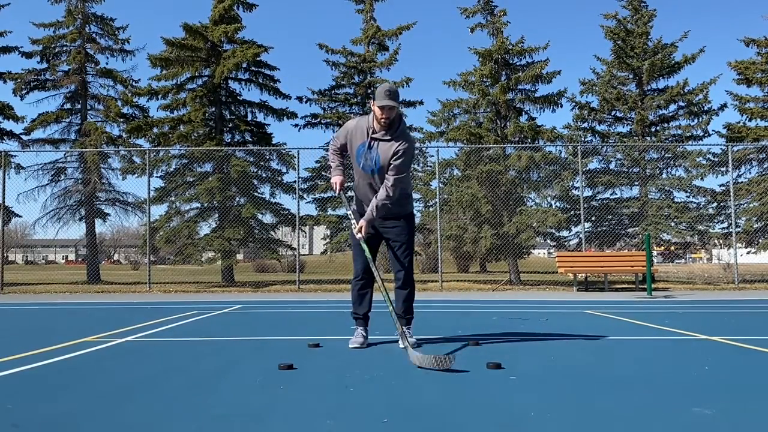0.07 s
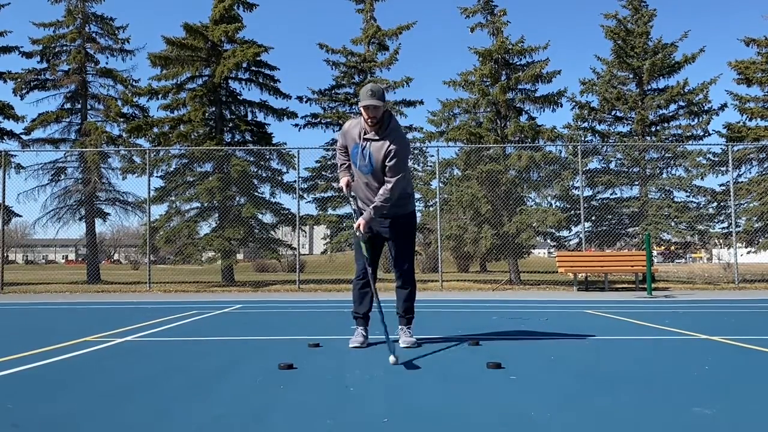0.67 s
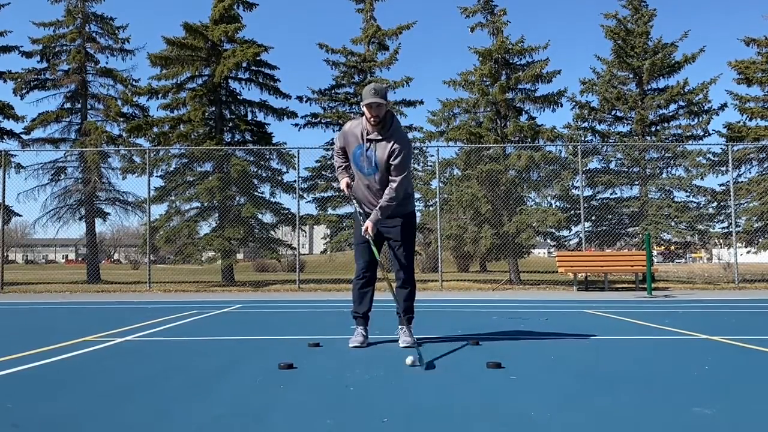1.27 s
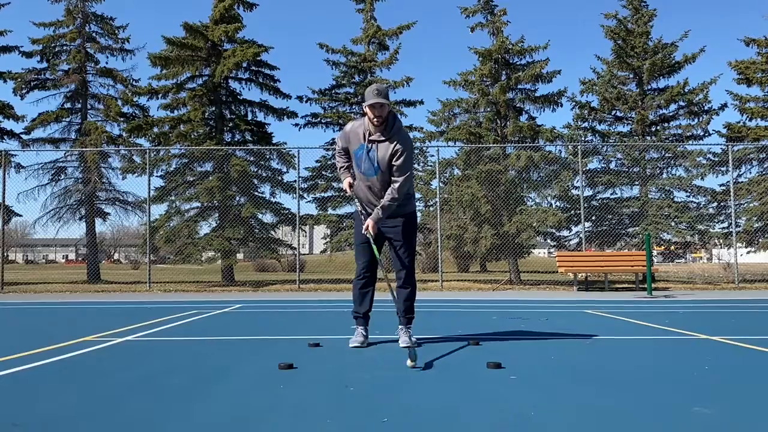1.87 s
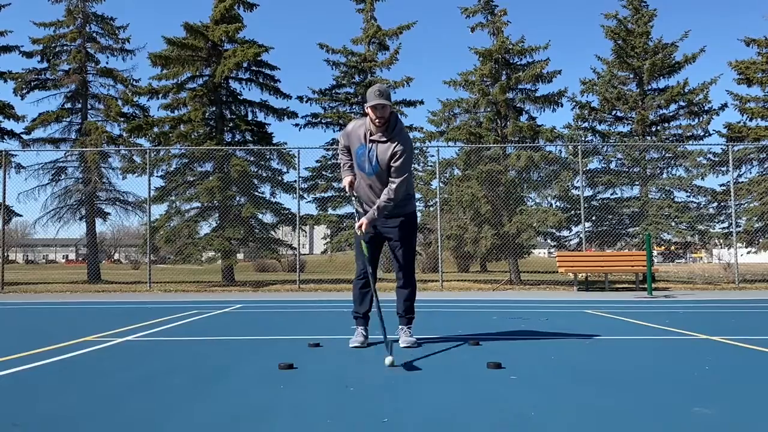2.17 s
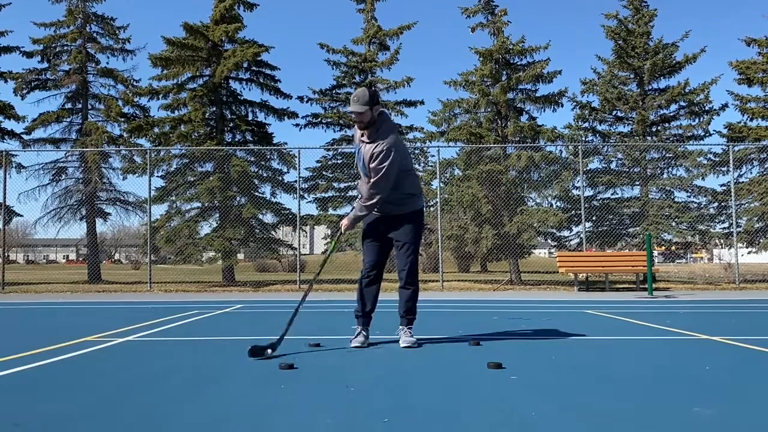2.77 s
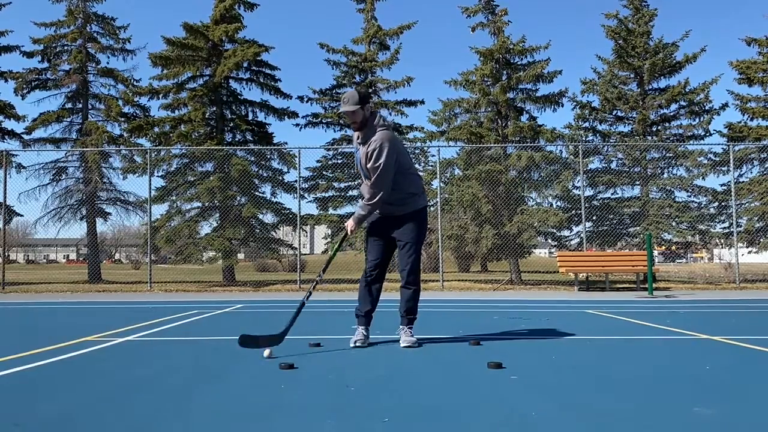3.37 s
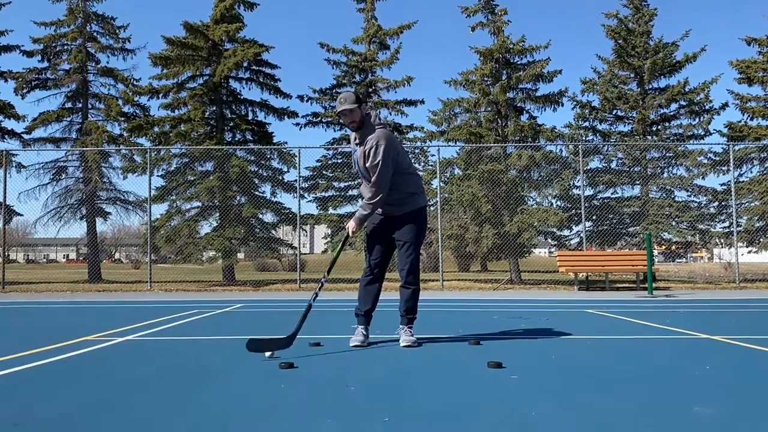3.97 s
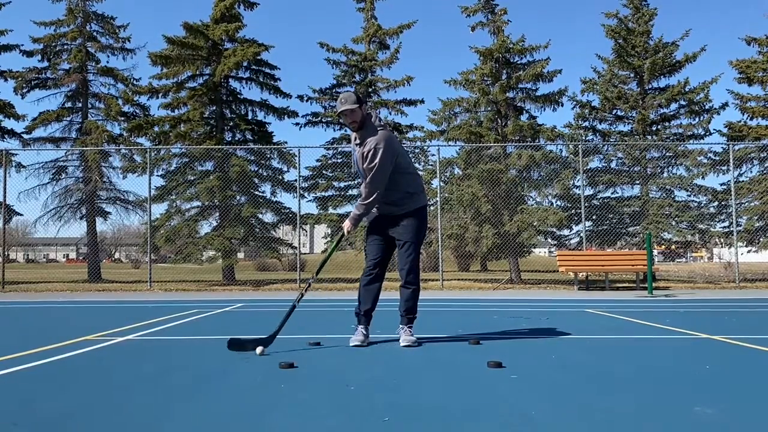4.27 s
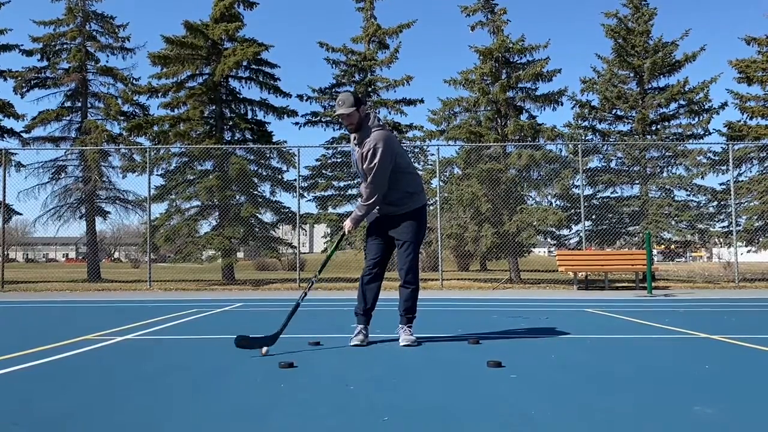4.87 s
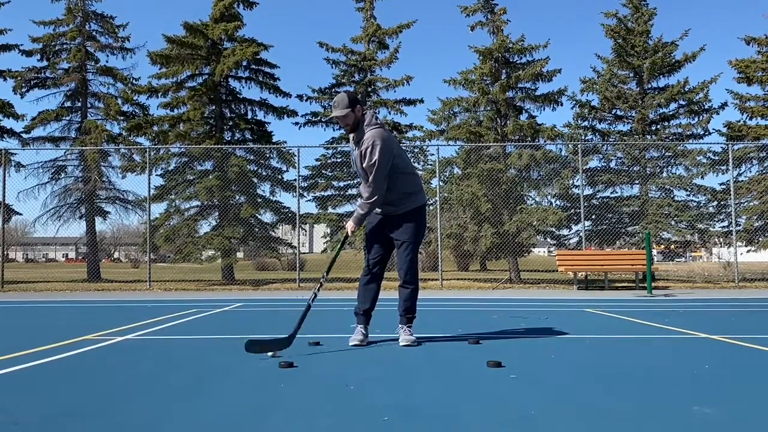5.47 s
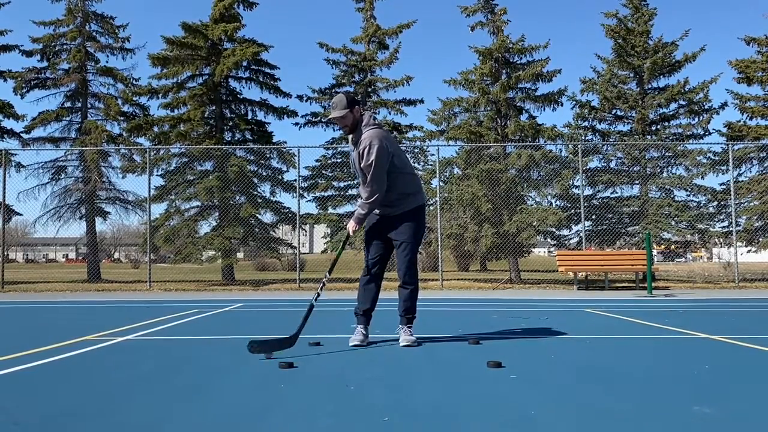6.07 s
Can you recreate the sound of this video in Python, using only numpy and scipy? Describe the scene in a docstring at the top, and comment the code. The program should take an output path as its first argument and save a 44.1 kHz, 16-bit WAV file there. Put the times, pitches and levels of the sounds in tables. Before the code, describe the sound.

A hockey stick dribbles a hard ball on an outdoor asphalt court for about six seconds. It opens with a loud, hollow crack and a short scrape, then sharp taps follow about four times a second, uneven in strength and often doubled as the blade chatters on the ground. Faint ringing lingers near 0.7, 2.1 and 2.4 seconds. Brief gritty scrapes come around 1.9, 2.4, 3.5 and 5.4 seconds. After a small gap, the tapping resumes at 2.8 seconds, slightly brighter and further left, settling into a steadier run of firm clacks until a last, softer one at about 6 seconds. Each hit sends a faint, quick echo back from the fence and trees. Beneath it all lie a quiet distant hush and light wind buffeting the microphone, with one stronger gust from about 5 to 5.5 seconds.

```python
"""Hockey dribble on an outdoor court.

A player dribbles a hard ball, first at his feet, then out to one side. The stick's hollow blade
cracks on the ball, chatters and scrapes on the asphalt; a faint ringing lingers after a few taps.
Fence and trees throw faint echoes back. Under it lie a distant hush and light wind that buffets the
two ports of the microphone, with one stronger gust near the end."""
import sys
import numpy as np
from scipy import signal
from scipy.fft import rfft, irfft
from scipy.io import wavfile

SR = 44100
rng = np.random.default_rng(int(sys.argv[2]) if len(sys.argv) > 2 else 0)


def inscribe(sig):
    """Save sig as 16-bit PCM at rate SR to the path in sys.argv[1].

    A 1-D sig is mono; a 2-D sig holds one channel per row.
    Samples are clipped to [-1, 1] before scaling.
    """
    pcm = np.round(np.clip(np.atleast_2d(sig).T, -1, 1) * 32767)
    wavfile.write(sys.argv[1], SR, pcm.astype(np.int16))


N = 274743
REACH_OUT_S = 2.6  # play moves from the feet to the side
COLOUR_WIDTH_HZ = 170  # broad band boosted or cut to give each tap its own colour


def amp(db):
    """Decibels to gain."""
    return 10 ** (np.asarray(db) / 20)


def unit_rms(x):
    """Scales to rms 1."""
    return x / np.sqrt(np.mean(x ** 2) + 1e-20)


def unit_energy(x):
    """Scales to energy 1."""
    return x / np.sqrt(np.sum(x ** 2) + 1e-20)


def lookup(points, hz, column=1):
    """Interpolates a table column over log frequency."""
    table = np.array(points, float)
    return np.interp(np.log(hz + 1), np.log(table[:, 0] + 1), table[:, column])


def coloured(x, points):
    """Filters x by a curve of f/Hz, gain/dB."""
    size = x.shape[-1]
    return irfft(rfft(x) * amp(lookup(points, np.fft.rfftfreq(size, 1 / SR))), size)


def resonance(sound, centre_hz, db, width_hz):
    """Boosts or cuts one resonance; output energy 1."""
    hz = np.fft.rfftfreq(len(sound), 1 / SR)
    response = 1 + (amp(db) - 1) / (1 + 1j * (hz - centre_hz) / width_hz)
    return unit_energy(irfft(rfft(sound) * response))


def add(mix, start_s, sound):
    """Mixes a sound in at start_s."""
    part = mix[..., max(round(start_s * SR), 0):][..., :sound.shape[-1]]
    part += sound[..., :part.shape[-1]]


def impulses(shape, per_s):
    """Sparse impulses of random time and strength."""
    return rng.standard_normal(shape) * (rng.random(shape) < per_s / SR)


def port_noise(spectrum, correlation):
    """Coloured noise, partly shared by the two ports."""
    shared, left, right = rng.standard_normal((3, N))
    noise = np.sqrt(correlation) * shared + np.sqrt(1 - correlation) * np.array([left, right])
    return unit_rms(coloured(noise, spectrum))


def lumps(depth_db, rate_hz):
    """Randomly swelling and sagging gain, rms 1."""
    band = [(rate_hz / 8, -20), (rate_hz / 3, 0), (rate_hz, 0), (2 * rate_hz, -20), (10 * rate_hz, -140)]
    swirl = unit_rms(coloured(rng.standard_normal(N), band))
    return unit_rms(amp(depth_db * np.minimum(swirl, 2)))


# Outdoor hush spectrum: f/Hz, level/dB
HUSH_SPECTRUM = [(20, 8), (200, -17.5), (700, 4.5), (1400, -4.5), (1900, -8), (3000, -19.5), (5500, -35),
                 (7300, -35), (8700, -42.5), (16000, -60)]


def hush(level_db=-54.0):
    """Steady noise of the distant outdoors."""
    return amp(level_db) * port_noise(HUSH_SPECTRUM, correlation=0.25)


# Wind strength at the microphone: t/s, level/dB
WIND_STRENGTH = [(0, -30.5), (.15, -40.5), (.35, -36), (.8, -39), (.92, -42), (1.199, -35.5), (1.45, -35.5),
                 (1.68, -45.5), (2.2, -40), (2.53, -44.5), (2.68, -37), (3.1, -40), (4.47, -42),
                 (4.849, -38.5), (5.01, -34), (5.14, -26), (5.26, -28), (5.34, -34.5), (5.78, -37.5),
                 (6.23, -37)]
# Spectra of slow, fast and gust-shed eddies: f/Hz, level/dB
RUMBLE_SPECTRUM = [(12, -51.5), (25, -23.5), (40, -9), (60, 2), (85, 0.5), (130, -3.5), (180, -5.5),
                   (260, -23.5), (600, -60), (2000, -130)]
FLUTTER_SPECTRUM = [(80, -21), (150, -7.5), (210, 4), (320, -3.5), (480, -11.5), (700, -21.5),
                    (1100, -34.5), (3000, -85), (8000, -120)]
GUST_SPECTRUM = [(50, -6.5), (110, 17.5), (220, 2), (400, 15.5), (620, 0.5), (900, -10), (1500, -41),
                 (4000, -84), (8000, -120)]


def wind(rumble_db=2.5, flutter_db=-6.0, gust_db=-6.0, gust_knee_db=-23, breeze_db=-38.5, slope=1.4851):
    """Eddies at the ports follow the wind, fast ones more steeply; a gust sheds smaller, higher ones."""
    slow_db = np.interp(np.arange(N) / SR, *np.transpose(WIND_STRENGTH))
    fast_db = breeze_db + slope * (slow_db - breeze_db)
    shed_db = fast_db + np.minimum(fast_db - gust_knee_db, 0)
    rumble = amp(slow_db + rumble_db) * port_noise(RUMBLE_SPECTRUM, 0.61)
    flutter = amp(fast_db + flutter_db) * lumps(3.0, rate_hz=27.0) * port_noise(FLUTTER_SPECTRUM, 0.78)
    gust = amp(shed_db + gust_db) * lumps(6.5, rate_hz=160) * port_noise(GUST_SPECTRUM, 0.75)
    return lumps(4.5, rate_hz=11.7) * (rumble + flutter) + gust


# Strongest single eddies: t/s, level/dB, f/Hz, half length/s
EDDIES = [(0.227, -32, 273, 0.0064), (0.433, -22.5, 236, 0.004), (0.827, -19.5, 189, 0.0045),
          (0.965, -29, 158, 0.0051), (1.066, -24, 199, 0.0058), (1.116, -29, 310, 0.013),
          (1.146, -32.5, 342, 0.0054), (1.219, -22.5, 310, 0.0036), (1.257, -32, 260, 0.011),
          (1.374, -28.5, 285, 0.013), (1.401, -19, 518, 0.0018), (1.415, -27, 236, 0.008),
          (1.45, -28, 94.3, 0.0058), (1.534, -32, 343.5, 0.0043), (1.562, -21, 368, 0.0033),
          (1.64, -33.5, 273, 0.0058), (1.817, -24.5, 247, 0.0089), (1.849, -18, 97.6, 0.01),
          (2.154, -25, 182.4, 0.0088), (2.645, -25, 156.4, 0.012), (2.661, -33.5, 224, 0.012),
          (2.762, -29.5, 218, 0.0077), (2.992, -23.5, 175, 0.0018), (3.227, -30.5, 219, 0.0037),
          (3.268, -27.5, 246, 0.0044), (3.481, -27.5, 190, 0.0044), (3.702, -26, 106.3, 0.0061),
          (4.084, -24.5, 166.5, 0.0036), (4.25, -32.5, 173.6, 0.016), (4.659, -30.5, 155.8, 0.013),
          (5.383, -26, 303.8, 0.011), (5.396, -9, 359, 0.0028), (5.409, -9.5, 104, 0.0097),
          (5.47, -31, 296, 0.0075), (5.502, -22, 190.2, 0.004), (5.53, -24, 213, 0.0066),
          (5.586, -12.5, 314, 0.004), (5.648, -26.5, 302, 0.0069), (5.705, -29, 258.6, 0.0068),
          (5.927, -28, 247, 0.0088), (5.955, -20.5, 169, 0.0098), (6.125, -26, 207.6, .011),
          (6.163, -23, 344, 0.0044)]


def buffets(level_db=-0.5, skew_rad=0.68, swirl_hz=90):
    """Single eddies shove the ports for a few uneven cycles, the two slightly out of step."""
    out, t = np.zeros((2, N)), np.arange(-SR // 10, SR // 10) / SR
    swirl_band = [(swirl_hz, 0), (4 * swirl_hz, -30), (20 * swirl_hz, -100)]
    for start_s, db, hz, half_s in EDDIES:
        wander = unit_rms(coloured(rng.standard_normal(len(t)), swirl_band))
        phase = rng.uniform(0, 2 * np.pi) + wander + skew_rad * np.array([[.5], [-.5]])
        crest = np.exp(1 - np.sqrt(1 + (t / half_s) ** 2))
        turns = hz * (.8 * t + half_s / 4 * np.arctan(4 * t / half_s))  # fastest as the core passes
        add(out, start_s + t[0], amp(db + level_db) * crest * np.cos(2 * np.pi * turns + phase))
    return out


# Microphone low cut: f/Hz, gain/dB
MIC_LOW_CUT = [(12, -24.5), (25, -12.5), (40, 0), (55, 0)]


def wind_at_mic(lean_db=0.4):
    """Wind and buffets, leaning left; the microphone sheds the deepest rumble."""
    return coloured(wind() + buffets(), MIC_LOW_CUT) * amp([[lean_db], [-lean_db]])


# Left port over right: f/Hz, from the feet/dB, from the side/dB
PORT_BALANCE = [(315, 2.5, 5), (800, 3, 4), (1290, 8.5, 11), (1420, 9, 9), (1900, -1, 5), (3030, 1, 5.5),
                (4520, 8, 8), (5950, 2.5, 11.5), (9400, 0.5, -1.5)]
# Phase lead of the left port: f/Hz, lead/rad
PORT_LEAD = [(300, 0), (1700, .25), (2500, 1.3), (3500, 2.1), (4300, 1), (5700, 1.6), (7000, -1),
             (8400, -3.1), (15500, -15.5)]


def at_ports(sound, at_side):
    """Direct sound reaches the two ports with different strength and phase."""
    hz = np.fft.rfftfreq(len(sound), 1 / SR)
    lean = amp(lookup(PORT_BALANCE, hz, column=1 + at_side))
    ports = np.array([lean, np.exp(-1j * lookup(PORT_LEAD, hz))]) / np.sqrt((1 + lean ** 2) / 2)
    return irfft(rfft(sound) * ports, len(sound)) * signal.windows.tukey(len(sound), 0.1)


# Fence posts, bench, trees: delay/s, level/dB from the feet; delay/s, level/dB from the side
REFLECTORS = [(.051, -33.5, .058, -32.5), (.063, -37.5, 0.069, -30.5), (.073, -37, .073, -49),
              (.082, -34, 0.097, -42.5), (0.091, -43, .097, -31), (0.097, -31.5, .104, -32),
              (.117, -39, .121, -34), (.126, -34, .126, -34), (.135, -37, .135, -39)]
# Echo colour: f/Hz, gain/dB
ECHO_SPECTRUM = [(300, -3), (1000, -6.5), (1650, 0.5), (1900, 4.5), (2300, -2), (4500, -3.5), (6500, -1.5),
                 (7600, -9.5), (9600, -8), (12000, -12.5)]


def echoes(at_side, fade_s=0.0033, wander_s=0.00097, vary_db=2, size=1024):
    """Each reflector returns a sharp tick; delay and strength shift a little from tap to tap."""
    out, t = np.zeros((2, SR)), np.arange(size) / SR
    for row in REFLECTORS:
        delay_s, db = row[2:] if at_side else row[:2]
        burst = rng.standard_normal((2, size)) * np.exp(-t / fade_s)
        delay_s += wander_s * rng.standard_normal()
        db += vary_db * rng.standard_normal()
        add(out, delay_s, amp(db) * np.sqrt(2) * unit_energy(burst))
    return coloured(out, ECHO_SPECTRUM)


# Scatter from fence mesh and trees: delay/s, level/dB
SCATTER_DECAY = [(.007, 19.5), (.02, 11), (.04, -5), (.065, -1), (.09, -6.5), (.11, -2), (.15, -1),
                 (.18, -9.5), (.25, -8.5), (.5, -42.5), (1, -61)]
# Scatter colour: f/Hz, gain/dB
SCATTER_SPECTRUM = [(200, 15), (700, 12.5), (1400, 3), (1780, -2), (1920, 7), (2080, -2), (2400, 1),
                    (3000, -3), (4500, -0.5), (6500, 3.5), (7600, -5), (8600, -9), (15000, -3.5)]


def court(sound, at_side, scatter_db=-18, spread=0.81, air_hz=7400, air_db_per_s=75,
          beam_db=2.44, beam_step_hz=600):
    """Fence and trees scatter a tap into a thin, grainy wash, with sharp echoes on top."""
    t = np.arange(SR) / SR
    decay_db = np.interp(t, *np.transpose(SCATTER_DECAY), left=-100)
    grains = impulses((3, SR), per_s=900)
    # the blade throws different pitches at every angle
    beam = [(k * beam_step_hz, beam_db * z) for k, z in enumerate(rng.standard_normal(size=64))]
    grains = coloured(grains[0] + spread * grains[1:], SCATTER_SPECTRUM)
    wash = np.sqrt(2) * unit_energy(coloured(grains, beam) * amp(decay_db))
    treble = coloured(wash, [(air_hz / 4, -50), (air_hz / 2, -14), (air_hz, 0)])
    wash -= treble * (1 - amp(-air_db_per_s * t))  # air absorption on long paths
    returns = amp(scatter_db) * wash + echoes(at_side)
    tapered = sound * signal.windows.tukey(len(sound), 0.1)
    return signal.fftconvolve(tapered[None], returns, axes=1)


# Faint ringing after a tap: t/s, length/s, level/dB, f/Hz
RING_TAILS = [(0.652, 0.17, -57, 2910), (2.143, 0.18, -53.5, 1940), (2.414, 0.17, -50.5, 1880)]


def ring_tails(ticks_per_s=300, width_hz=300, overtone_ratio=1.32, overtone_db=-8):
    """Faint pitched ringing lingers after a tap: random ticks through two resonances."""
    out = np.zeros((2, N))
    for start_s, length_s, db, ring_hz in RING_TAILS:
        size = int(length_s * SR)
        hz = np.fft.rfftfreq(size, 1 / SR)
        ticks = impulses(size, ticks_per_s)
        modes = [(ring_hz, 1), (ring_hz * overtone_ratio, amp(overtone_db))]
        response = sum(gain / (1 + 2j * (hz - mode_hz) / width_hz) ** 2 for mode_hz, gain in modes)
        sound = unit_rms(irfft(rfft(ticks) * response, size)) * signal.windows.tukey(size, .7)
        add(out, start_s, amp(db) * at_ports(sound, int(start_s > REACH_OUT_S)))
    return out


# Blade sliding on after a tap: t/s, level/dB
BLADE_SLIDES = [(.05, -68.5), (.405, -82), (0.634, -69), (1.118, -78), (1.607, -84), (1.889, -79.5),
                (2.131, -81), (2.82, -69), (3.341, -73), (3.594, -73), (3.862, -68), (4.142, -74),
                (4.378, -73.5), (4.626, -80.5), (4.86, -77.5), (5.345, -71), (5.591, -70), (5.83, -70.5)]
# Sizzle of fine grit: f/Hz, level/dB
SIZZLE_SPECTRUM = [(1000, -20), (2000, -10.5), (4000, 1.5), (6500, 1), (8300, -9), (9600, 1),
                   (12000, -11.5), (14300, -1.5), (15200, -6), (16000, -18.5)]


def slides(rise_s=0.006, hold_s=0.03, fade_db_per_s=250, grains_per_s=2500, size=12000):
    """Fine grit hisses in uneven spurts under the blade and dies away as it lifts."""
    out, t = np.zeros((2, N)), np.arange(size) / SR
    envelope = np.minimum(t / rise_s, 1) * amp(-fade_db_per_s * np.maximum(t - hold_s, 0))
    for start_s, db in BLADE_SLIDES:
        sizzle = unit_rms(coloured(impulses((2, size), grains_per_s), SIZZLE_SPECTRUM))
        add(out, start_s, amp(db) * envelope * sizzle)
    return out * lumps(4.5, rate_hz=90)


# Blade dragging: t/s, length/s, level/dB, relative grit/dB
BLADE_SCRAPES = [(0.003, 0.027, -38.5, -2), (0.115, 0.052, -50, -17), (0.338, 0.026, -57, -5),
                 (1.864, 0.05, -46.5, -29), (2.35, 0.13, -49, -13), (3.047, 0.057, -53.5, -17),
                 (3.546, 0.043, -48, -22), (5.089, 0.095, -58.5, -18), (5.357, 0.042, -52.5, -5.5)]


def scrapes(grains_per_s=900, rasp_hz=2300, rasp_db=5, fade_db=6):
    """Grains of asphalt catch the dragged blade, each a tiny tap."""
    out = np.zeros((2, N))
    for start_s, length_s, db, grit_db in BLADE_SCRAPES:
        at_side, size = int(start_s > REACH_OUT_S), int(length_s * SR)
        tick, lead_in_s = tap(bass_db=0, treble_db=5, chatter=0, grit_db=grit_db, at_side=at_side)
        tick = resonance(tick, rasp_hz, rasp_db, COLOUR_WIDTH_HZ)
        catches = impulses(size, grains_per_s) * signal.windows.tukey(size, .5)
        catches *= amp(np.linspace(0, -fade_db, size))  # pressure eases off
        rasp = signal.fftconvolve(unit_rms(catches), tick)
        add(out, start_s - lead_in_s, amp(db) * at_ports(rasp, at_side))
    return out


# Stick modes: f/Hz, t60/s before t60_scale, level at the feet/dB, level at the side/dB
STICK_MODES = [(535, 0.053, -22.5, -12.5), (696, 0.024, -4, 2.5), (825, 0.011, 5.5, -1),
               (1052, 0.023, -1, -1.5), (1325, 0.0053, -18, -27), (1356, 0.01, 10, 12),
               (1624, 0.041, 2.5, -4), (1968, 0.0099, 5, 1.5), (1865, 0.021, 6, 2), (2286, 0.012, 9, 9),
               (2656, 0.0063, 16.5, 9.5), (2910, 0.016, 6, 3), (3290, 0.013, 14.5, 7.5),
               (3750, 0.021, 8.5, 7.5), (4230, 0.02, -4, 0.5), (4610, 0.023, -0.5, 3.5),
               (5110, 0.025, -13, -15.5), (5507, 0.015, 10.5, 14), (6330, 0.014, -25.5, 6),
               (7100, 0.0075, -15, -13), (7110, 0.015, -1.5, 9.5), (9100, 0.015, -1.5, -15)]
# Grit crunch under the blade: f/Hz, level/dB
GRIT_SPECTRUM = [(2000, -16.5), (5000, 2), (7000, -4), (8500, -3), (9800, -8.5), (12000, -14.5),
                 (14300, -12), (16000, -16.5)]


def tap(bass_db, treble_db, chatter, grit_db, at_side, contact_hz=2000, t60_scale=0.77,
        spread_s=0.0017, evenness=0.63, vary_db=2, detune=0.0041, grit_t60_s=0.021,
        thud_db=-16, thud_hz=300, thud_t60_s=0.00085, size=4096):
    """A sharp contact, then tiny ones as the blade settles, ring the stick; returns sound, lead-in/s."""
    t, hz = np.arange(size) / SR, np.fft.rfftfreq(size, 1 / SR)
    offsets_db = vary_db * rng.standard_normal(len(STICK_MODES))
    ring = np.zeros(size)
    for (mode_hz, t60_s, *levels_db), offset_db in zip(STICK_MODES, offsets_db):
        decay = amp(levels_db[at_side] + offset_db - 60 * t / (t60_s * t60_scale))
        ring += decay * np.cos(2 * np.pi * mode_hz * rng.normal(1, detune) * t)
    ring[0] /= 2
    blow = rfft(ring) / (1 + 1j * hz / contact_hz) ** 2  # finite contact time rounds the blow
    settle_s = 0.0028 if at_side else 0.0038  # from ball contact to ground contact
    skid = rfft(rng.standard_normal(size) * np.exp(-.5 * ((t - settle_s) / spread_s) ** 2))
    skid /= (abs(skid) + 1) ** evenness  # many contacts excite all modes about alike
    sound = np.sqrt(chatter) * unit_energy(irfft(blow * skid))
    sound -= np.sqrt(1 - chatter) * unit_energy(irfft(blow))
    sound += amp(thud_db) * unit_energy(np.sin(2 * np.pi * thud_hz * t) * amp(-60 * t / thud_t60_s))
    tone = [(800, bass_db), (1500, 0.019), (2100, 0.022), (4000, treble_db)]
    sound = unit_energy(coloured(sound, tone))
    crunch = rng.standard_normal(size) * amp(-60 * t / grit_t60_s)
    sound += amp(grit_db) * unit_energy(coloured(crunch, GRIT_SPECTRUM))
    return np.roll(sound, size // 16), size // 16 / SR


def crack(sound, lead_in_s, fade_s=0.0023):
    """The first, broadband instant of a tap, which carries to the fence."""
    age_s = np.maximum(np.arange(len(sound)) / SR - lead_in_s, 0)
    return unit_energy(sound * np.exp(-age_s / fade_s))


# Blade taps: t/s, level/dB, treble/dB, ground chatter share/0-1, relative grit/dB; then the
# tap's colour: broad band f/Hz, boost or cut/dB, narrow resonance f/Hz, boost or cut/dB
BLADE_TAPS = [(0.0316, 15, -5, 0.07, -17.5, 4600, 9, 1205, 9),
              (0.0711, -4.5, -17, 0.18, -29, 1650, -3.5, 1900, -3.5),
              (0.320, -0.5, -3, 0.91, -19, 3320, 8, 1860, 10),
              (0.3897, -2, 1, 0.43, -33, 1930, 13.5, 1050, 5.5),
              (0.6134, 12, -7, 0.49, -14.5, 2980, 10.5, 1690, 9.5),
              (0.6859, -19, -5, 0.04, -11, 2980, 2, 1640, 13),
              (0.8305, -2.5, -5.5, 0.77, -52.5, 1620, 16, 2280, 6),
              (0.845, -3.5, -5.5, 0.66, -28, 1230, 7, 1630, 5),
              (1.098, 7.5, -5, 0.75, -36, 1420, 6.5, 5730, 8),
              (1.3438, -10, -16, 0.57, -20.5, 1450, 11, 1880, 4),
              (1.3569, 2.5, -3, 0.79, -20.5, 1620, 8, 1880, 2.5),
              (1.5868, 4.5, -5, 0.75, -19, 4200, 9, 1870, 7.5),
              (1.8402, -4.5, -20, 0.47, -27, 2270, 5, 1650, 7),
              (1.8734, 4, -1.5, 0.65, -11.5, 1610, 7, 1070, 8.5),
              (2.1116, 9, -7, 0.77, -19.5, 1900, -2.5, 2170, 9),
              (2.3506, 4, -0.5, 0.66, -30.5, 1180, 6, 1880, 10),
              (2.3841, 14, -0.5, 0.18, -36, 1770, 7.5, 1760, -0.5),
              (2.4682, -23, -6, 0.2, -34, 1880, 6, 2890, 5), (2.8032, 12, -3, 0.3, -38, 5700, 5.5, 2820, 7),
              (3.0229, -2.5, -5, 0.44, -54, 1630, 7, 1040, 8),
              (3.0674, -1.5, -2, 0.62, -29, 1470, 11, 1050, 3),
              (3.3245, 13, -4.5, 0.29, -21.5, 1350, 2, 1880, 3.5),
              (3.336, -0.5, -19, 0, -47, 1400, -8.5, 695, -16),
              (3.552, -1, 1, 0.86, -50, 1730, 6.5, 1050, -5.5),
              (3.565, 8.5, -5, 0.05, -43, 910, 7, 3360, 8.5),
              (3.578, 0, 2, 0.32, -20, 1020, 13.5, 1630, 11), (3.71, -34.5, -1, 0.1, 5, 3960, -4, 5560, -2),
              (3.8464, 11, -5.5, 0.24, -25, 3750, 4.5, 1430, -3),
              (4.084, -1.5, -7.5, 0.8, -22.5, 1520, 12, 1050, 6),
              (4.1242, 11.5, -0.5, 0.21, -17, 2206, 3.5, 4780, 6),
              (4.3585, 12, -3.5, 0.4, -33, 5700, 6, 2800, 2),
              (4.378, -19.5, -8, 1, -45.5, 1100, 22.5, 700, 9),
              (4.6076, 11.5, -4.5, 0.29, -15.5, 7230, 7, 1660, 5),
              (4.628, -10, -14, 0.06, -46, 1050, 22, 700, 12),
              (4.842, 12, -6, 0.28, -30.5, 5420, 10, 4670, 4),
              (4.8611, -2, -6.5, 0.07, -38, 1200, 4.5, 1050, 8.5),
              (5.0646, 4, -14, 0.4, -50, 4020, 17.5, 1584, 8),
              (5.3265, 11.5, -1.5, 0.41, -44.5, 1940, 1, 5400, 8.5),
              (5.347, -3, -23, 0, -41, 1260, 13, 693, 4), (5.5715, 10, -14.5, 0.23, -25, 3900, 10, 956, 7),
              (5.8106, 11.5, -2, 0.45, -18.5, 1850, 4.5, 720, 6),
              (5.826, -1.5, 4, 0.1, -45, 1470, 13, 1050, 8), (6.0201, 3, -7, 0.63, -48, 1080, 6.5, 1980, 5)]


def dribble(narrow_width_hz=46, thrown_db=-4.5, slap_db=12.5, beamed_hz=5650, beamed_db=5):
    """Taps with their echoes: harder blows carry less bass, ground slaps throw more at the fence."""
    out = np.zeros((2, N))
    for start_s, db, treble_db, chatter, grit_db, broad_hz, broad_db, narrow_hz, narrow_db in BLADE_TAPS:
        at_side = int(start_s > REACH_OUT_S)
        bass_db = db * np.interp(chatter, [0, 1], [-0.2354, -1.26])
        sound, lead_in_s = tap(bass_db, treble_db, chatter, grit_db, at_side)
        sound = resonance(sound, broad_hz, broad_db, COLOUR_WIDTH_HZ)
        sound = resonance(sound, narrow_hz, narrow_db, narrow_width_hz)
        # at the side, one blade mode faces the microphone and misses the fence
        thrown = resonance(crack(sound, lead_in_s), beamed_hz, -beamed_db * at_side, width_hz=150)
        add(out, start_s - lead_in_s, amp(db) * at_ports(sound, at_side))
        add(out, start_s - lead_in_s, amp(db + thrown_db + slap_db * chatter) * court(thrown, at_side))
    return out


def scene():
    """Stick and ball over wind and distant hush."""
    return wind_at_mic() + dribble() + scrapes() + slides() + ring_tails() + hush()


def record(dry, ceiling=0.95, cutoff_hz=16500):
    """Soft peak limit, then low-pass."""
    rounded = dry / (1 + (dry / ceiling) ** 6) ** (1 / 6)
    low_pass = signal.firwin(511, cutoff_hz, window=("kaiser", 9), fs=SR)
    return signal.oaconvolve(rounded, low_pass[None], "same")


dry = scene()
out = record(dry)
inscribe(out)
```